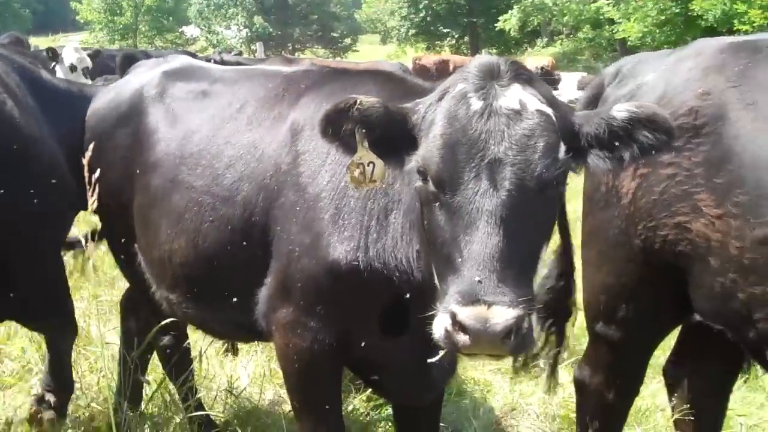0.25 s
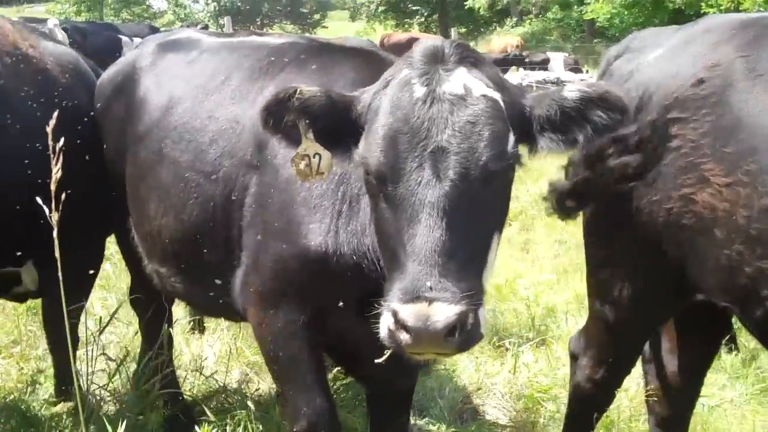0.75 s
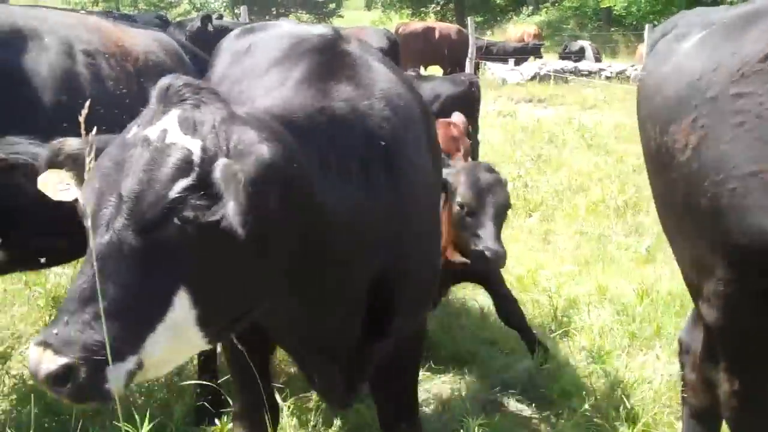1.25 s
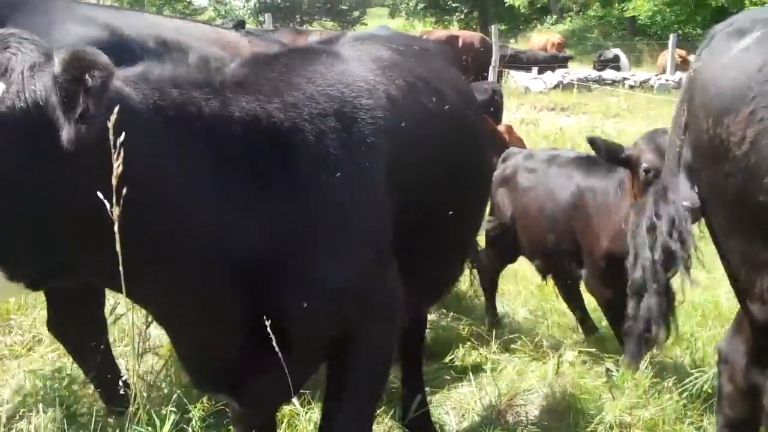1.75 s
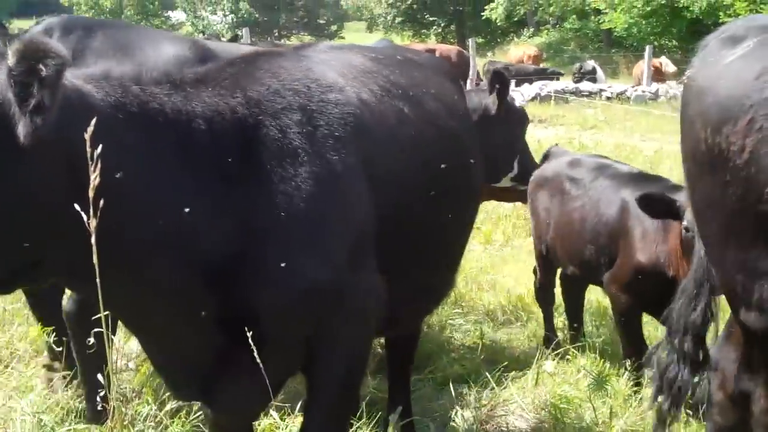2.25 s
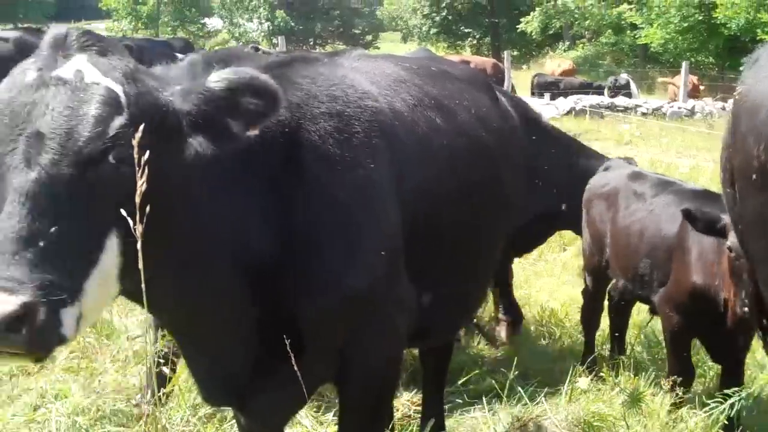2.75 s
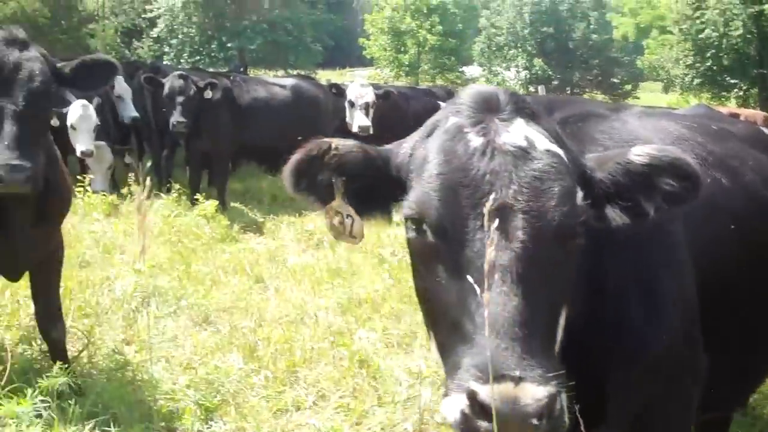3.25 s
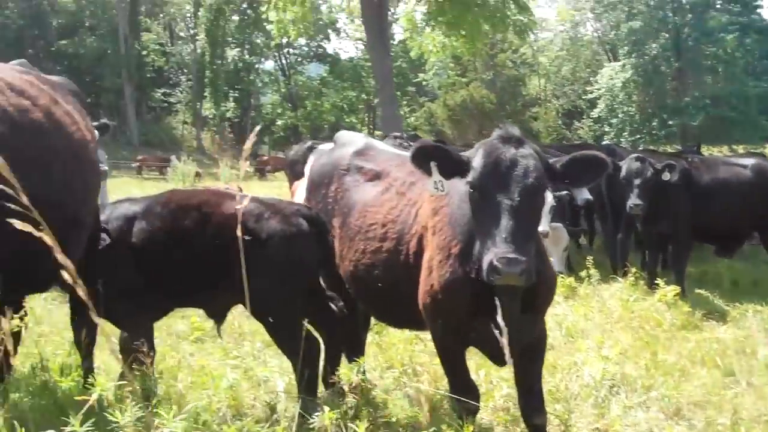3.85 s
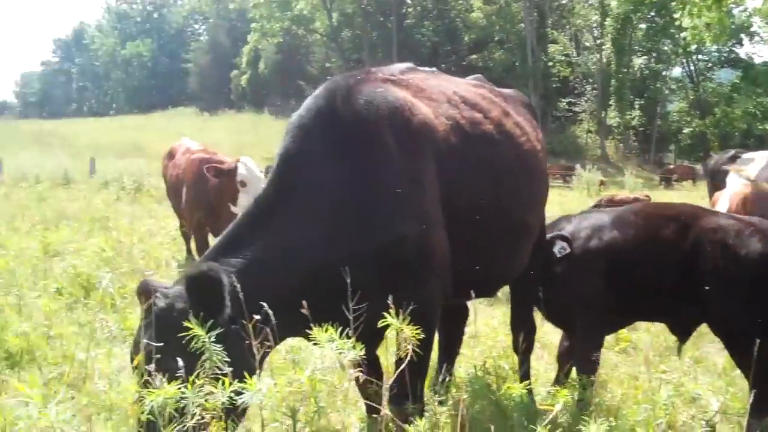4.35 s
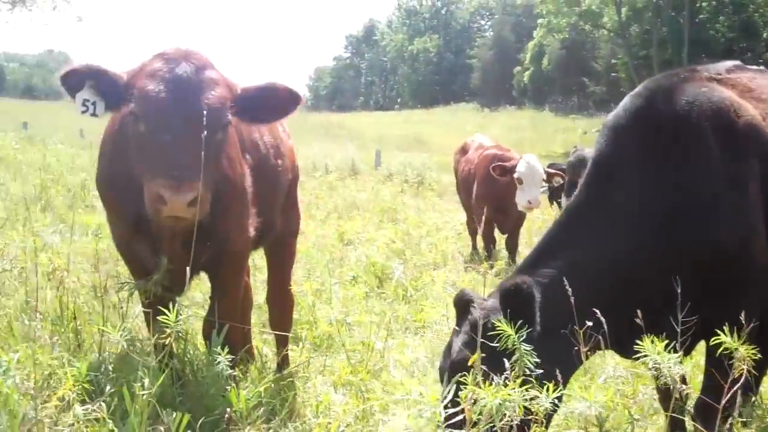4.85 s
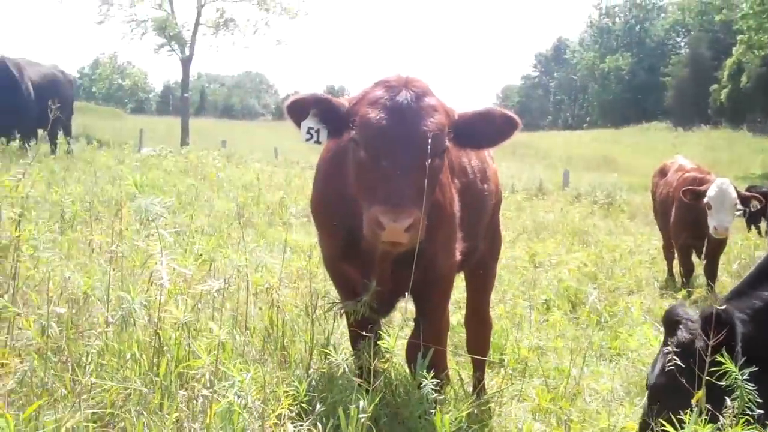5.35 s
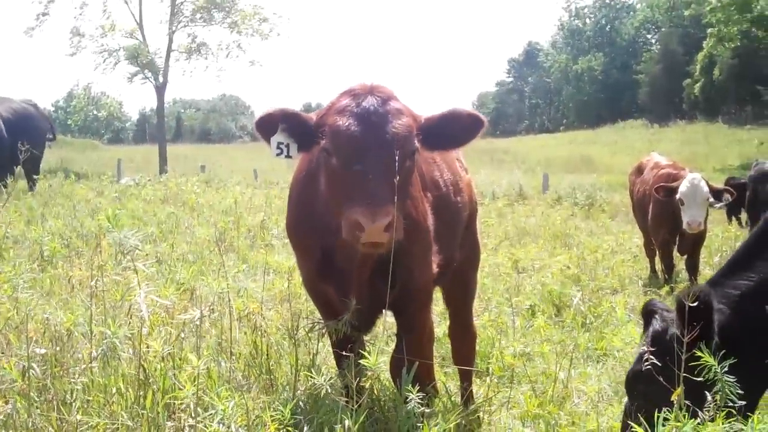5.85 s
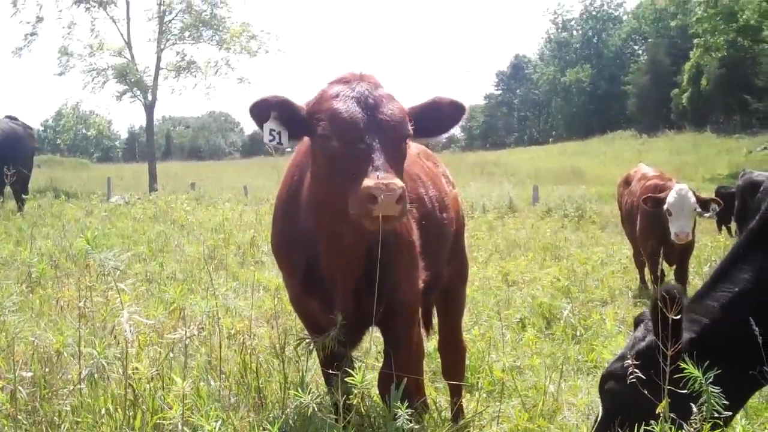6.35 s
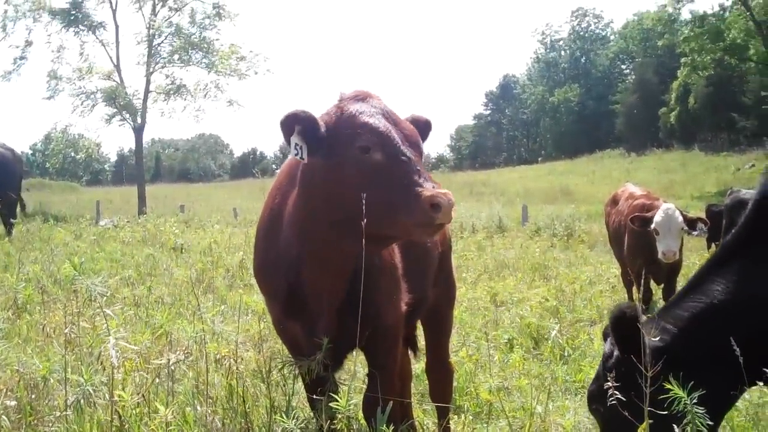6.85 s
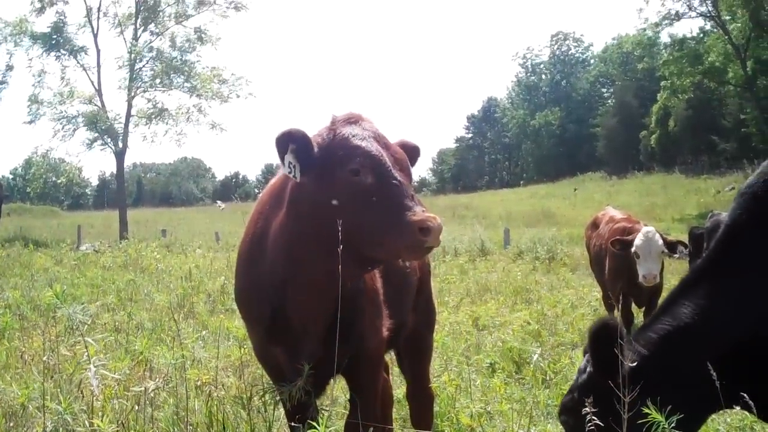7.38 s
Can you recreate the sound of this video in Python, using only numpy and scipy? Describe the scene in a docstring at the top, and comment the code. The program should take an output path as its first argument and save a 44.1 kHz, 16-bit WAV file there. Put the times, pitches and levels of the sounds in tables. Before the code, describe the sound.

Cattle call one after another outdoors over a soft insect hiss. A rising moo comes first, with legs brushing through grass and stalks snapping. The loudest call follows, a raspy, climbing moo very close to the microphone. After it, a more distant animal squeals and holds a moo, and a last hoarse moo rises into a high squeal. Light hoof steps fall in between, and trees return a dull echo.

```python
"""A summer pasture where cattle moo one after another, one of them right beside the microphone.
Pulses from the vocal folds ring the throat: a call starts as a low hum and climbs, and several break
into a high held squeal and drop out of it at the end. Hooves swish through tall grass, stalks snap,
insects hiss, and the tree line throws the calls back. The nearest call makes the recorder turn down
its gain, so the field sinks away and creeps back."""
import sys
import numpy as np
from scipy import signal
from scipy.fft import rfft, irfft, next_fast_len
from scipy.io import wavfile
from scipy.ndimage import uniform_filter1d, minimum_filter1d

SR = 44100
rng = np.random.default_rng(int(sys.argv[2]) if len(sys.argv) > 2 else 0)


def put_to_file(sound):
    """Save the sound as 16-bit audio at rate SR, in the file named by the first command-line argument."""
    columns = np.atleast_2d(sound).T  # one column per channel
    safe = np.clip(columns, -1, 1)
    whole_steps = np.round(safe * 32767)
    wavfile.write(sys.argv[1], SR, whole_steps.astype(np.int16))


N = 335975
TIME = np.arange(N) / SR
TREBLE_LIMIT_HZ = 14250

# Levels in the tables are relative. A moo has three bands: low hum, open-mouth tone, brassy edge.
# the call beside the microphone: (time [s], hum [dB], tone [dB], edge [dB])
CLOSE_CALL = [(2.2, -58, -53, -53), (2.33, -41, -42.5, -53), (2.455, -35.5, -35, -38),
              (2.475, -29, -27, -26), (2.6, -26.5, -22.5, -16), (2.78, -23, -13, -11),
              (2.88, -28.5, -12, -7.5), (3.0, -26.5, -11.5, -4), (3.165, -24.5, -22, -15),
              (3.21, -37, -34, -29.5)]
# the sound of grass being brushed: (frequency [Hz], level [dB])
GRASS_SPECTRUM = [(710, -27), (1200, -10), (1550, -8.5), (2160, -1.5), (2690, -0.5), (4060, 0.5),
                  (6270, -2.5), (8920, -0.5), (10100, -0.5), (13100, -14.5), (14200, -15)]


def amp(db):
    """Turns decibels into a gain."""
    return 10 ** (np.asarray(db) / 20)


def unit(x):
    """Scales a sound to an average power of one."""
    return x / np.sqrt(np.mean(x ** 2) + 1e-20)


def follow(rows):
    """Joins a table's rows with straight lines; gives the sample times and a curve for each column."""
    times, *columns = np.transpose(rows)
    t = np.arange(times[0], times[-1], 1 / SR)
    return t, [np.interp(t, times, column) for column in columns]


def placed(start_s, sound):
    """Puts a sound on an otherwise silent track."""
    return np.interp(np.arange(N) - round(start_s * SR), np.arange(len(sound)), sound, 0, 0)


def envelope(t, length, attack_s, release_s):
    """Rises, holds and falls to silence within length."""
    return np.clip(t / attack_s, 0, 1) * np.clip((length - t) / release_s, 0, 1)


def wander(size, hz):
    """A smooth random wobble, up to about hz times a second."""
    padded = next_fast_len(size + SR)
    f = np.fft.rfftfreq(padded, 1 / SR)
    return unit(irfft(rfft(rng.standard_normal(padded)) * np.exp(-(f / hz) ** 2)))[:size]


def colour(x, spectrum):
    """Filters a sound by rows of (frequency [Hz], level [dB]); the peaks ring after each pulse."""
    hz, db = np.transpose(spectrum)
    bins_hz = abs(np.fft.fftfreq(2048, 1 / SR))
    log_gain = np.log(amp(np.interp(np.log(bins_hz + 1), np.log(hz + 1), db)))
    ringing = np.fft.ifft(np.exp(np.conj(signal.hilbert(log_gain)))).real
    return signal.oaconvolve(x, ringing)[:len(x)]


def noise(spectrum, size=N):
    """Steady noise with the given spectrum."""
    return unit(colour(rng.standard_normal(size), spectrum))


def lowpass(x, hz):
    """Keeps what lies below hz, without delaying it."""
    return signal.sosfiltfilt(signal.butter(5, hz, fs=SR, output="sos"), x)


def stereo(x, lead_ms, tilt_db=-2.0):
    """The microphone's left side hears the sound lead_ms earlier and tilt_db louder than its right."""
    size = next_fast_len(N + 64)
    hz = np.fft.rfftfreq(size, 1 / SR)
    left = amp(tilt_db / 2) * np.exp(1j * np.pi * hz * lead_ms / 1000)
    return irfft(rfft(x, size) * np.array([left, 1 / left]), size)[:, :N]


def meadow(murmur_db=-48, hiss_db=-50, throb_db=2):
    """The open field murmurs low and steady under a hiss of insects."""
    # the field's murmur and the insects' hiss: (frequency [Hz], level [dB])
    murmur_spectrum = [(15, -29), (25, -5), (129, -3.5), (216, -6), (248, -4), (378, -2.5), (525, -8),
                       (624, -5), (787, -11), (883, -3.5), (1050, -10), (1130, -12.5), (1490, -17.5),
                       (2500, -18.5), (3250, -43), (5500, -120)]
    hiss_spectrum = [(710, -33.5), (1200, 3.5), (1490, -3.5), (1550, -2), (1890, -4.5), (2050, -9.5),
                     (2230, 2), (2420, -5), (3310, 0.5), (3480, -2.5), (3780, 1.5), (5660, 0.5),
                     (8560, -2.5), (11400, -15), (14200, -28)]
    # insects that sing in narrow bands: (frequency [Hz], width [Hz], level [dB])
    insects = [(3824, 160, -66), (5350, 580, -62.5), (6150, 300, -60.5)]
    murmur = stereo(noise(murmur_spectrum), lead_ms=0)
    murmur += amp(-11) * np.array([noise(murmur_spectrum), noise(murmur_spectrum)])
    hiss = stereo(noise(hiss_spectrum), lead_ms=-0.081, tilt_db=-6)
    hiss += amp(-2) * np.array([noise(hiss_spectrum), noise(hiss_spectrum)])
    song = 0
    for hz, width, db in insects:
        band = [(hz - 2 * width, -40), (hz - width / 2, -3), (hz, 0),
                (hz + width / 2, -3), (hz + 2 * width, -40)]
        song += amp(db + throb_db * wander(N, 32)) * noise(band)
    murmur *= amp(murmur_db + 1.3 * wander(N, 21))
    hiss *= amp(hiss_db + 1.3 * wander(N, 65))
    return murmur + hiss + stereo(song, lead_ms=-0.056)


def rustle(grains_per_s=1200, crackle_db=-2):
    """Rubbing stalks make a smooth hiss dotted with tiny clicks."""
    grains = rng.standard_normal(N) * (rng.random(N) < grains_per_s / SR)
    grains *= amp(2.5 * np.minimum(rng.exponential(1, N), 5))  # a few clicks stand out
    return unit(colour(rng.standard_normal(N) + amp(crackle_db) * unit(grains), GRASS_SPECTRUM))


def grass(gain_db=2.5, flicker_db=2.5, spread_db=-4):
    """Stalks rustle against legs, swelling with each stride."""
    # legs brushing through grass: (start [s], length [s], level [dB])
    strides = [(.17, 0.34, -45), (0.468, 0.07, -31), (0.563, 0.17, -44.5), (.8, .48, -46.5),
               (1.12, 0.14, -44), (1.28, 0.075, -38), (1.516, 0.4, -49), (1.91, 0.17, -45.5),
               (2.27, 0.29, -48)]
    # the herd stirring between strides: (time [s], level [dB])
    stirring = [(0, -52), (2.4, -50), (3.4, -59), (5.8, -63.5), (7, -52.5), (7.62, -62)]
    swish = stereo(rustle(), lead_ms=0.027, tilt_db=-4)
    swish += amp(spread_db) * np.array([rustle(), rustle()])
    stride_power = sum((amp(db) * envelope(TIME - start, length, attack_s=0.052, release_s=0.11)) ** 2
                       for start, length, db in strides)
    stir_power = amp(np.interp(TIME, *np.transpose(stirring))) ** 2
    return swish * amp(gain_db + flicker_db * wander(N, 8.8)) * np.sqrt(stride_power + stir_power)


def snaps():
    """Dry stalks break with one sharp crack and a few milliseconds of splintering."""
    # breaking stalks: (time [s], peak level [dB], brightest frequency [Hz])
    stalks = [(.331, -34, 8500), (.583, -26, 8500), (1.151, -24, 5000), (1.179, -11, 8300),
              (5.93, -35, 8500), (5.949, -29.5, 8800), (6.203, -26, 3500), (6.5, -30, 11000)]
    t, out = np.arange(900) / SR, 0
    for start, db, hz in stalks:
        burst = (np.exp(-t / .0006) + .1 * np.exp(-t / .004)) * rng.standard_normal(len(t))
        crack = colour(burst, [(200, -18), (hz / 5, -3), (hz * 0.72, -1), (hz, 9), (hz * 1.55, -7)])
        out += placed(start, amp(db) * crack / abs(crack).max())
    return stereo(out, lead_ms=0.033)


def grunt_and_hooves():
    """A short low grunt, the tail of a moo, opens the scene; then hooves push turf and crunch grass."""
    # the grunt (first row), then the footfalls:
    # (start [s], length [s], low noise level [dB], its frequency [Hz], crunch level [dB])
    bursts = [(-.03, 0.099, -37.5, 327, -65), (1.105, 0.2, -49, 614, -39.5),
              (1.849, 0.075, -39.5, 137, -52), (1.902, .1, -40, 308, -49), (3.458, 0.084, -44, 397, -39.5),
              (3.751, 0.095, -35.5, 404, -51), (5.064, 0.072, -41.5, 540, -39),
              (5.978, 0.11, -52, 80.4, -101)]
    out = 0
    for start, length, low_db, hz, crunch_db in bursts:
        swell = np.hanning(int(length * SR))
        low = noise([(hz / 4, -22), (hz, 0), (hz * 2, -16), (hz * 8, -50)], len(swell))
        crunch = noise(GRASS_SPECTRUM, len(swell))
        out += placed(start, swell * (amp(low_db) * low + amp(crunch_db) * crunch))
    return stereo(out, lead_ms=0.042)


def scatter(x, patterns):
    """Many small echoes blur a sound, with one pattern of echoes for each side."""
    return np.array([signal.oaconvolve(x, echoes / np.linalg.norm(echoes))[:N] for echoes in patterns])


def tree_line(x, fade_s=0.97, echoes_per_s=2000):
    """The woods return two distinct echoes and a dull scattered tail."""
    t = np.arange(SR) / SR
    echoes = rng.choice([-1., 1.], (2, SR)) * (rng.random((2, SR)) < echoes_per_s / SR)
    swell_and_fade = (1 - np.exp(-t / 0.065)) * amp(-60 * t / fade_s)
    dull = colour(x, [(100, -5.5), (300, -6), (600, 4), (1000, 3), (1600, 10.5),
                      (2500, -0.5), (6000, -47)])
    tail = scatter(dull, echoes * swell_and_fade)
    return tail + amp(-5) * placed(.12, dull) + amp(-8) * placed(.21, dull)


def nearby_echoes(x, scatter_db=-13, decay_s=.004):
    """Stalks and the flanks of other animals scatter the treble within a few milliseconds."""
    t = np.arange(1500) / SR
    echoes = rng.standard_normal((2, len(t))) * np.exp(-t / decay_s)
    treble = x - lowpass(x, 1800)
    return amp(scatter_db) * scatter(treble, echoes)


def flank_bounce(x, first_ms=1.18, last_ms=2.254, bounce_db=-6):
    """An echo off a passing flank: its path lengthens, so dips drift through the call's treble."""
    delay_s = np.interp(TIME, [CLOSE_CALL[0][0], CLOSE_CALL[-1][0]], [first_ms, last_ms]) / 1000
    treble = x - lowpass(x, 2300)
    return amp(bounce_db) * np.interp(TIME - delay_s, TIME, treble)


def voice(hz, band_db, throat, air, jitter, shimmer):
    """Vocal-fold pulses and puffs of air ring the throat; jitter shakes the pitch, shimmer the level."""
    size = len(hz)
    octaves_per_s = uniform_filter1d(abs(np.gradient(np.log2(hz))) * SR, 900)
    leap = np.clip(octaves_per_s - 1, 0, 5)  # the folds turn unsteady where the pitch leaps
    hz = hz * (1 + jitter * (1 + leap / 2) * wander(size, 65))
    cycles = np.cumsum(hz) / SR
    folds = sum(np.cos(2 * np.pi * k * cycles) * (k * hz < TREBLE_LIMIT_HZ)
                for k in range(1, int(TREBLE_LIMIT_HZ / hz.min())))
    folds *= 1 + shimmer * wander(size, 49)
    puffs = (0.9 + np.exp(-(cycles % 1) / 2.7)) * rng.standard_normal(size)
    air_share = np.clip(air + .03 * leap, 0, .8)
    sound = colour((1 - air_share) * unit(folds) + air_share * unit(puffs), throat)
    # the opening mouth shifts the weight from hum to tone to edge
    hum, below_edge = lowpass(sound, 473), lowpass(sound, 1247)
    tone, edge = below_edge - hum, sound - below_edge
    out = 0
    for band, db in zip((hum, tone, edge), band_db):
        power = uniform_filter1d(uniform_filter1d(band ** 2, 1100), 1100)
        out += amp(db) * band / np.sqrt(abs(power) + 1e-12)
    return out * signal.windows.tukey(size, min(1, 0.014 * SR / size))


def short_call(start, length, first_hz, last_hz, hum_db, tone_db, edge_db, air, throat):
    """One brief, even glide of the chest voice."""
    t = np.arange(0, length, 1 / SR)
    hz = np.geomspace(first_hz, last_hz, len(t))
    sound = voice(hz, (hum_db, tone_db, edge_db), throat, air, jitter=0.009, shimmer=0.11)
    return placed(start, sound * envelope(t, length, attack_s=0.026, release_s=0.026))


def squeal(start, length, pitch_hz, slide, drop_hz, flare_db, first_db, last_db, break_s=0.0584):
    """The folds flip to a high voice: clean harmonics, a rasp, rushing air, and a break at the end."""
    t = np.arange(0, length, 1 / SR)
    size = len(t)
    breaking = np.clip(1 - (length - t) / break_s, 0, 1)
    hz = pitch_hz + slide * t - drop_hz * breaking ** 2
    phase = 2 * np.pi * np.cumsum(hz * (1 + 0.0045 * wander(size, 55))) / SR
    first, second, third = np.linspace(first_db, last_db, size).T
    flare = flare_db * np.sin(np.pi * breaking)
    harmonic_db = [first, second + flare] + [third + flare / 2 - 7 * k for k in range(4)]
    tone = sum(amp(db + 1.6 * min(k / 2, 1) * wander(size, 13)) * np.sin(k * phase)
               for k, db in enumerate(harmonic_db, 1))
    # the level flutters at a third of the pitch
    rasp = 1 + 0.057 * (wander(size, 190) * np.cos(phase / 3) + wander(size, 500) / 2)
    air = noise([(300, -43), (900, 4), (1500, -26), (2400, 8), (3000, -3),
                 (4000, -16), (8000, -37)], size)
    sound = np.sqrt(2) * tone * rasp + amp(first - 25) * air * (1 + np.cos(phase))
    return placed(start, sound * envelope(t, length, attack_s=0.039, release_s=0.024))


def moo(rows, throat, air, jitter, shimmer=0.1, gain_db=0, ease_s=0.026):
    """A long call in the chest voice; the pitch eases round its turns."""
    t, (hz, *band_db) = follow(rows)
    hz = uniform_filter1d(hz, int(ease_s * SR), mode="nearest")
    return placed(t[0], amp(gain_db) * voice(hz, band_db, throat, air, jitter, shimmer))


def far_cattle():
    """Four animals farther off moo, grunt or squeal, each on a track of its own; cattle still farther away low
    faintly on the track of the one behind."""
    # long calls: (time [s], pitch [Hz], hum [dB], tone [dB], edge [dB])
    opening_rise = [(.05, 88.1, -45, -69, -58), (.19, 96.7, -42, -63, -61), (.304, 114.3, -38.5, -51, -53),
                    (.43, 145.2, -37, -69, -56), (.505, 185.6, -37, -40, -44.5),
                    (.62, 204.1, -37, -43, -49), (.67, 249, -45, -44, -54)]
    opening_moo = [(.645, 254.6, -44, -42.5, -71), (.72, 281.7, -57.5, -33, -43),
                   (.876, 281.8, -40, -29, -43.5), (.96, 275.8, -34.5, -36.5, -43),
                   (1.005, 183.3, -40, -44, -49), (1.06, 125.5, -35.5, -64, -52)]
    hum_after_squeal = [(2.57, 271, -53, -30, -63), (2.63, 233, -27.5, -39, -49),
                        (2.7, 199.3, -32, -54, -52), (2.83, 220, -31, -30, -50),
                        (2.95, 197.2, -36.5, -41, -53), (3.0, 133.3, -28.5, -46, -55)]
    held_moo = [(4.39, 263.6, -44, -39, -47), (4.476, 249, -26.5, -35, -49), (4.515, 206.2, -31, -39, -44),
                (4.64, 218.3, -26.5, -30.5, -49), (4.94, 218.3, -26, -31.5, -45),
                (4.995, 158.6, -36, -37.5, -45), (5.016, 144, -23.5, -58, -46), (5.04, 138, -44, -55, -60)]
    hoarse_moo = [(6.12, 78.8, -62, -56, -58), (6.2, 89.65, -43, -52, -65), (6.295, 100.5, -39, -50, -58),
                  (6.436, 136.4, -27.5, -38.5, -40.5), (6.514, 156.8, -28.5, -32.5, -36.5),
                  (6.592, 177.6, -31, -34, -35.5), (6.68, 202, -36, -30, -33),
                  (6.73, 221.3, -27, -25.5, -48)]
    # how throat and mouth ring, first with the mouth nearly shut: (frequency [Hz], level [dB])
    shut_throat = [(55, -22), (95, 0.5), (185, 4), (280, -4), (400, -6), (600, -4), (790, 4.5), (1000, -4),
                   (1180, 0.5), (1400, -9.5), (1650, -6.5), (2500, -20), (6000, -41)]
    open_throat = [(70, -13), (180, 6.5), (290, 0.5), (420, -11), (565, 1), (850, -16), (980, 4),
                   (1120, -13), (1400, -17.5), (1700, -9.5), (2100, -26), (3200, -32), (6000, -56)]
    held_throat = [(60, -41), (130, -19), (220, -2), (300, -6.5), (440, -17.5), (650, -2.5), (880, -1),
                   (1100, -11.5), (1320, -10), (1700, -6.5), (2200, -9.5), (2900, -13), (3600, -36),
                   (7000, -58)]
    hoarse_throat = [(45, -73), (90, 17.5), (150, 8), (280, 15.5), (410, -6), (620, 19.5), (850, 20),
                     (1150, -1.5), (1550, -17.5), (2050, -11.5), (2450, -23), (2850, -16.5), (3600, -54),
                     (7000, -48)]
    # short lows, grunts and cracks of the voice; the rows at 1.6 s and 3.2 s are distant cattle lowing, placed
    # where the one behind stands: (caller, start [s], length [s], first pitch [Hz], # last pitch [Hz], hum
    # [dB], tone [dB], edge [dB], air [0-1])
    grunts = [("behind", 1.6, 0.285, 250, 350, -49, -58, -75, 0.52),
              ("behind", 2.035, .155, 106, 186, -40, -58, -61, .07),
              ("behind", 2.165, .075, 495, 545, -65, -41.5, -48, 0.18),
              ("behind", 3.2, 0.57, 690, 590, -48, -49, -61, 0.68),
              ("middle", 3.83, 0.12, 124, 148, -35.5, -45, -47, 0.46),
              ("middle", 3.89, 0.1195, 300, 328, -56, -37, -47, .1),
              ("middle", 3.99, .18, 160, 168, -55, -41, -48, 0.49),
              ("middle", 4.36, 0.14, 340, 245, -42, -37, -44.5, 0.46),
              ("last", 6.705, 0.084, 268, 310, -35, -46, -47, 0.18),
              ("last", 6.95, 0.11, 286, 310, -60, -51, -45.5, 0.85),
              ("last", 7.08, 0.2, 255, 240, -45, -45, -61, 0.34),
              ("last", 7.18, .05, 300, 265, -31, -36, -48, .15),
              ("last", 7.205, 0.063, 160, 128, -35.5, -47, -45, 0.23)]
    # high squeals: (caller, start [s], length [s], pitch [Hz], slide [Hz/s], final drop [Hz],
    # final flare [dB], first three harmonics at the start [dB], the same at the end [dB])
    squeals = [("behind", 2.225, 0.4, 583, -39.5, -36, 4.3, (-34, -38.5, -49), (-28, -36, -34)),
               ("middle", 4.145, 0.285, 583, -87, 2.2, 1.3, (-30.5, -38, -35.5), (-30, -32, -43)),
               ("middle", 4.45, .18, 559, 35, 0, 0, (-32, -46, -55), (-41, -51, -45)),
               ("last", 6.735, .49, 569, 10.3, 73, 15.3, (-30, -41.5, -56), (-22, -45.5, -47.5))]
    calls = {"opening": moo(opening_rise, shut_throat, air=0.066, jitter=0.0073, gain_db=-3.5)
                        + moo(opening_moo, open_throat, air=0.09, jitter=0.0039, gain_db=-1),
             "behind": moo(hum_after_squeal, held_throat, air=0.06, jitter=0.0028),
             "middle": moo(held_moo, held_throat, air=0.15, jitter=0.0048, shimmer=.037, gain_db=-2.5),
             "last": moo(hoarse_moo, hoarse_throat, air=0.09, jitter=0.007, gain_db=-5)}
    for caller, *row in grunts:
        calls[caller] += short_call(*row, shut_throat if caller == "behind" else hoarse_throat)
    for caller, *row in squeals:
        calls[caller] += squeal(*row)
    return calls


def overtone(call, width_hz=130):
    """A narrow sliding resonance picks harmonics out of the voice and makes them whistle."""
    # a strained whistle sliding down into the close call: (time [s], frequency [Hz], level [dB])
    whistle_path = [(2.26, 3190, -52), (2.38, 2890, -37), (2.46, 2620, -29.5), (2.54, 2930, -30),
                    (2.68, 2950, -26), (2.73, 2550, -25), (2.79, 2524, -17.5), (2.84, 2400, -29)]
    t, (hz, db) = follow(whistle_path)
    part = call[round(t[0] * SR):][:len(t)]
    # shift the whistle's frequency down to zero, keep a narrow band there, and shift it back
    shift = np.exp(2j * np.pi * np.cumsum(hz) / SR)
    decay = np.exp(-np.pi * width_hz / SR)
    ring = signal.lfilter([(1 - decay) ** 2], [1, -2 * decay, decay * decay], part / shift)
    ring /= np.sqrt(uniform_filter1d(abs(ring) ** 2, 2200) + 1e-14)  # even out the level
    whistle = np.sqrt(2) * (ring * shift).real
    return placed(t[0], amp(db) * whistle * signal.windows.tukey(len(t), .1))


def close_moo(start_hz=102.8, top_hz=165.9, end_hz=101.8, octaves_per_s=1.09, drop_s=.23, ease_s=.07):
    """The nearest cow's pitch climbs evenly, holds, and falls ever faster as her air runs out."""
    # how her throat and mouth ring: (frequency [Hz], level [dB])
    throat = [(50, -65), (112, -4), (140, -28), (168, -21), (300, 0.5), (650, -17), (950, -5.5),
              (1150, -16.5), (1310, -21), (1480, 4.5), (1680, -5.5), (1980, 14), (2250, -19), (2500, 4),
              (2750, -6.5), (3050, 5.5), (3400, -6), (4000, 3.5), (4400, -3), (4900, -14.5), (5700, -27.5),
              (6700, -21.5), (8200, -34.5), (11000, -44), (15000, -83)]
    t, band_db = follow(CLOSE_CALL)
    climb = np.minimum(start_hz * 2 ** (octaves_per_s * (t - t[0])), top_hz)
    drop = np.clip(1 - (t[-1] - t) / drop_s, 0, 1) ** 2
    hz = uniform_filter1d(climb, int(ease_s * SR), mode="nearest") - (top_hz - end_hz) * drop
    call = amp(-1) * voice(hz, band_db, throat, air=.05, jitter=.0012, shimmer=0.05)
    # air rasps through each pulse, growing and fading with her hum
    cycles = np.cumsum(hz) / SR
    puffs = (0.9 + np.exp(-(cycles % 1) / 0.51)) * rng.standard_normal(len(t))
    rasp = unit(colour(puffs, [(1500, -23), (3000, -7), (4200, 1), (5600, -0.5), (8500, -10),
                               (11400, -16), (14200, -44)]))
    return placed(t[0], call + amp(band_db[0] - 11) * rasp)


def herd():
    """Five animals, and a few far-off cattle, call from five places; the farther ones carry more echo."""
    # where each caller stands: (lead on the left [ms], left minus right [dB], echo [dB])
    places = {"opening": (0.018, -1.8, -10.5), "behind": (-.03, -2, -9), "close": (0.12, -1.1, -44),
              "middle": (-0.069, -1.9, -13.5), "last": (-.11, -3.0, -20)}
    close = close_moo()
    calls = far_cattle()
    calls["close"] = close + overtone(close) + flank_bounce(close)
    direct, to_trees = 0, 0
    for caller, (lead_ms, tilt_db, echo_db) in places.items():
        direct += stereo(calls[caller], lead_ms, tilt_db)
        to_trees += amp(echo_db) * calls[caller]
    return direct + nearby_echoes(calls["close"]) + tree_line(to_trees)


def gain_control(x, limit_db=-13.5, hold_s=0.6, recover_db_per_s=12):
    """Turns the gain down at once when the sound passes the limit, holds it, then recovers slowly."""
    power_db = 10 * np.log10(abs(uniform_filter1d((x ** 2).mean(0), size=1800)) + 1e-12)
    wanted_gain_db = np.minimum(limit_db - power_db, 0)
    hold = int(hold_s * SR)
    held_cut_db = -minimum_filter1d(wanted_gain_db, hold, origin=(hold - 1) // 2)
    recovery_db = recover_db_per_s * TIME
    cut_db = np.maximum.accumulate(held_cut_db + recovery_db) - recovery_db
    return x / amp(uniform_filter1d(cut_db, size=400))


def scene():
    """The herd, its steps and the field around it."""
    return herd() + grass() + snaps() + grunt_and_hooves() + meadow()


def record(dry):
    """The recorder turns down after the loudest call, rounds off tall peaks and cuts the top treble."""
    ducked = gain_control(dry)
    knee, headroom = .7, .22  # where the rounding starts, and how far past it a peak may reach
    below = np.clip(ducked, -knee, knee)
    rounded = below + headroom * np.tanh((ducked - below) / headroom)
    treble_cut = signal.firwin(511, TREBLE_LIMIT_HZ, window=("kaiser", 9), fs=SR)
    return signal.oaconvolve(rounded, treble_cut[None], "same")


dry = scene()
out = record(dry)
put_to_file(out)
```